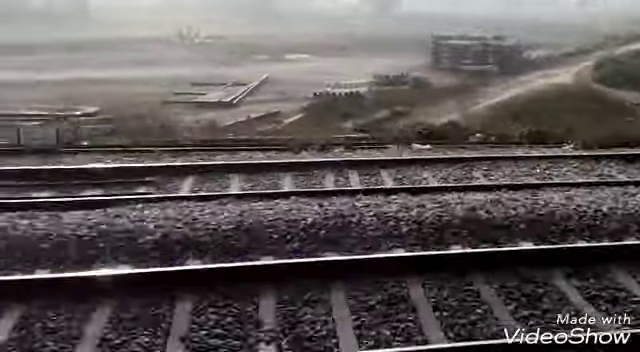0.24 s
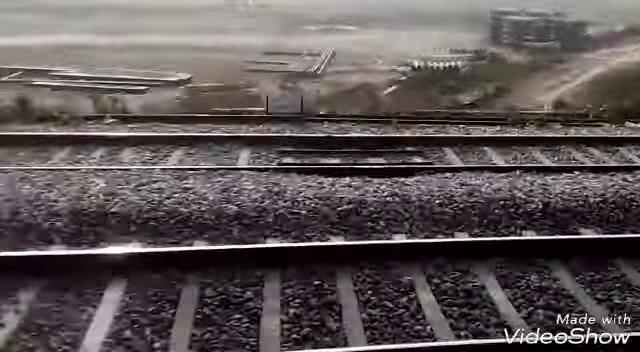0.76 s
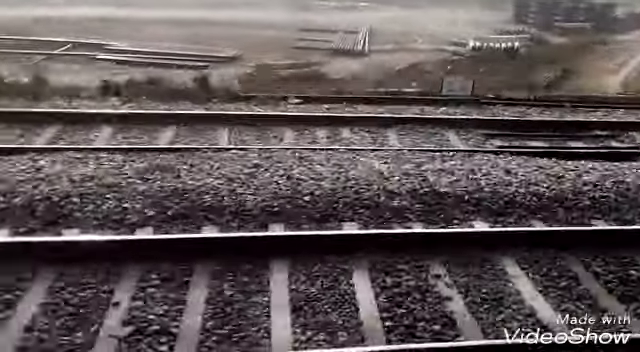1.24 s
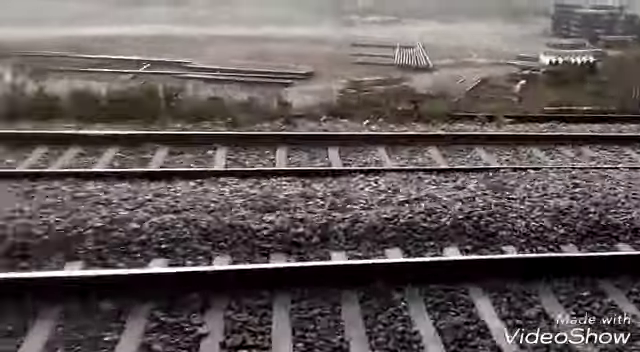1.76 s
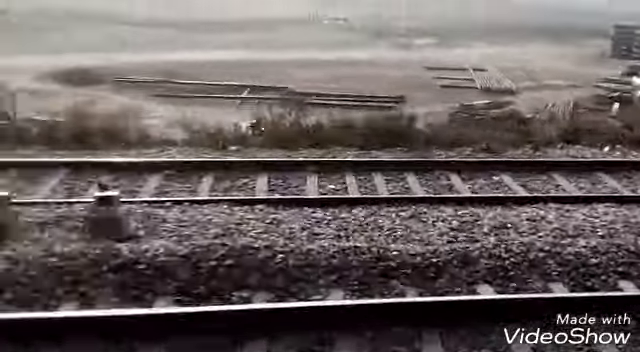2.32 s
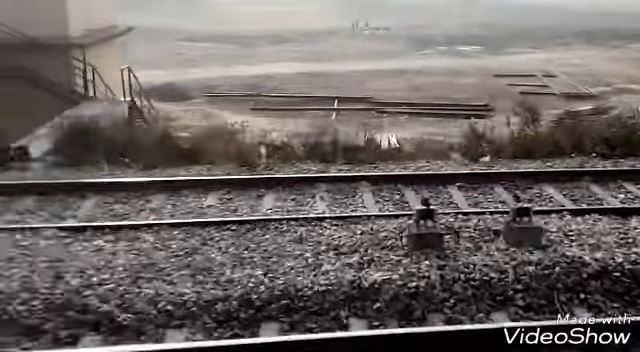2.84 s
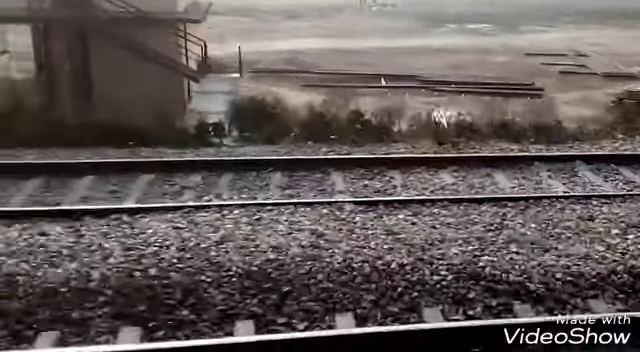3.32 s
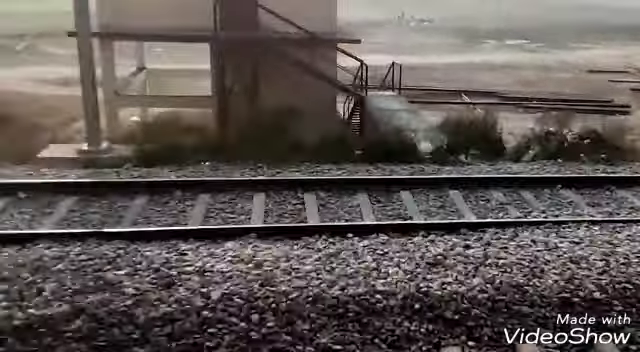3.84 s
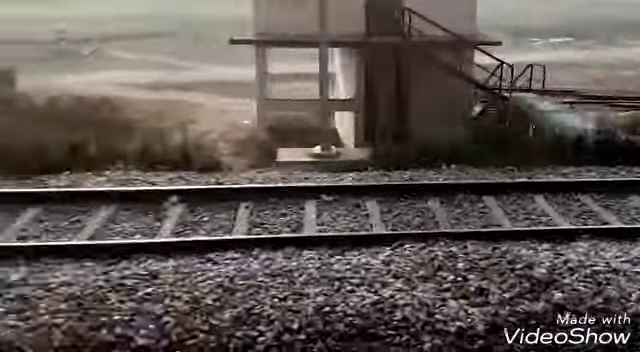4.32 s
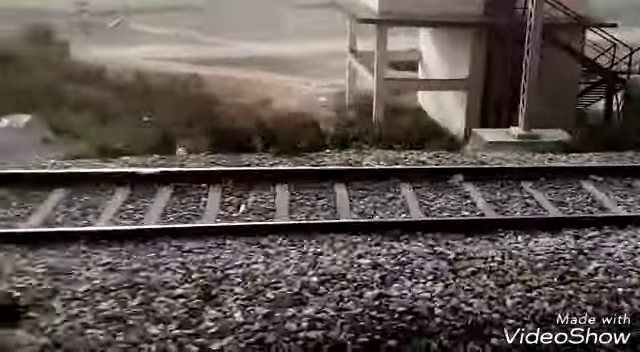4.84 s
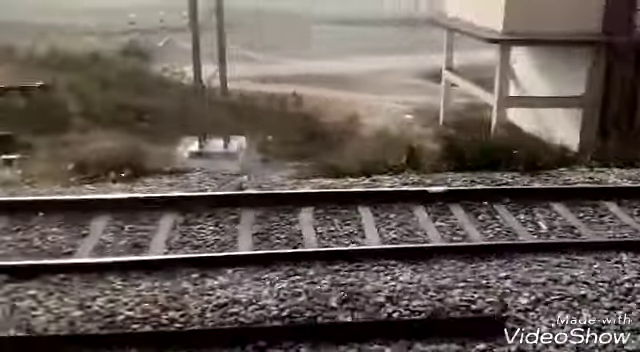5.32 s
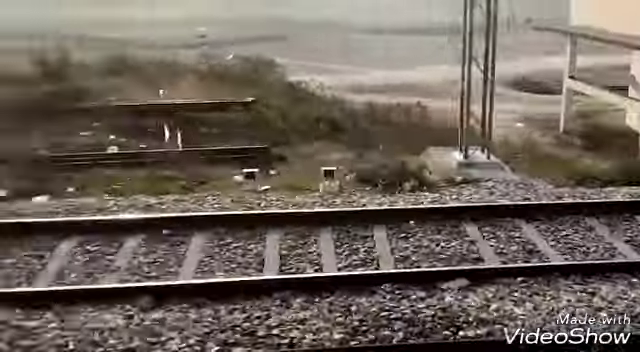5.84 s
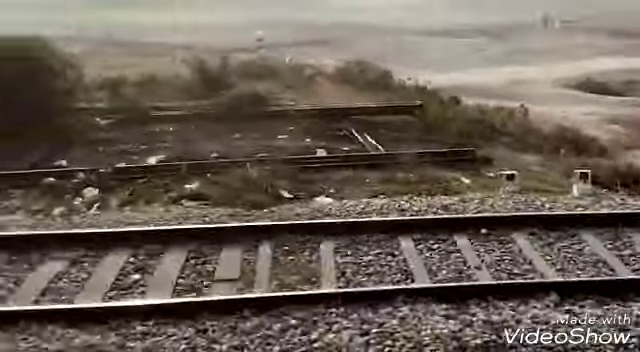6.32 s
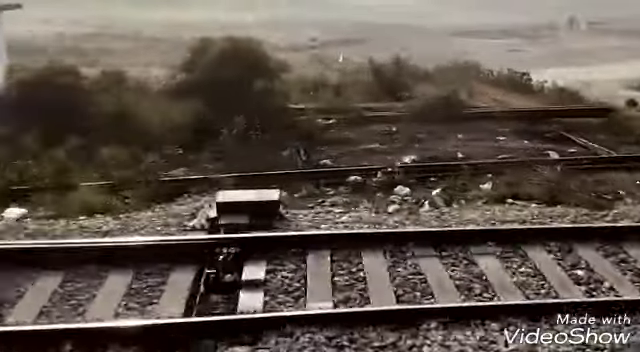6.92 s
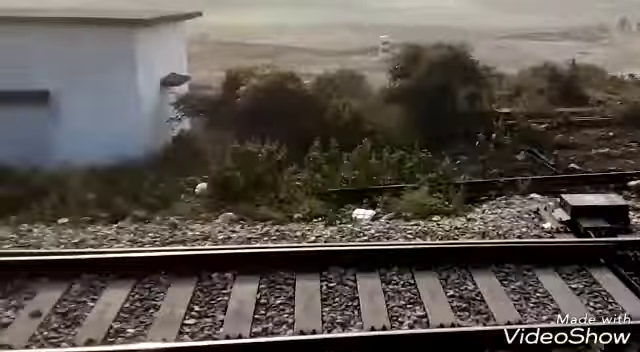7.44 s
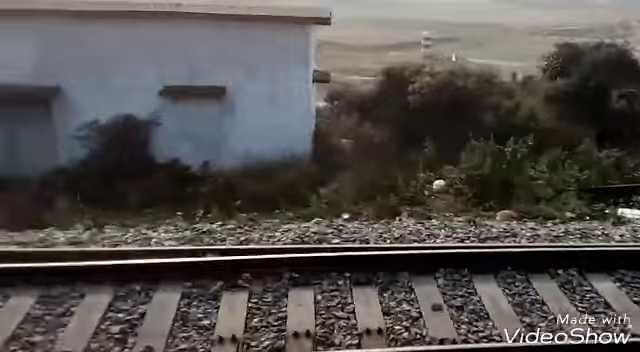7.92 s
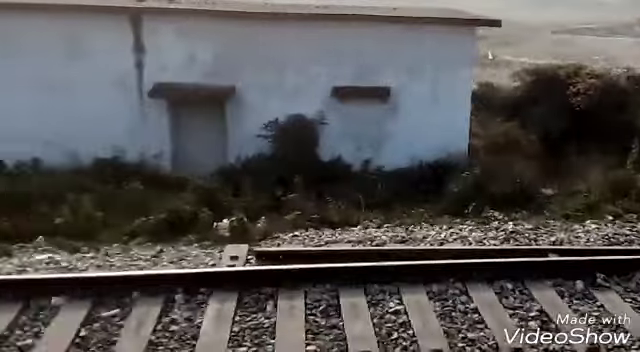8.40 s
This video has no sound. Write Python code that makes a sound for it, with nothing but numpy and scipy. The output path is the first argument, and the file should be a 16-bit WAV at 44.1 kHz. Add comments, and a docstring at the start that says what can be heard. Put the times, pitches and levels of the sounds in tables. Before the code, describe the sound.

A close, boxy coach interior with low, bass-heavy train rumble and irregular wheel knocks. It begins rough, with rapid overlapping thumps and muffled steel rattle, then thins to separate double thuds with hollow panel knocks and a humming body. Weak, broken squeals and scraping pass midway. From about 7.3 seconds the knocks bunch up again, heavy and clanking. The microphone is inside, so high frequencies stay faint.

```python
"""Railway coach on uneven track.

Heard inside a coach rolling slowly through a yard: wheels rumble (shaped noise) and knock over joints.
Each knock is a floor heave with ringing body modes; steel clatters in bursts of taps, clacks and clanks.
The body booms and sways after jolts, wall panels hum (resonated noise), a loose panel knocks.
The flange rubs (many tiny squeaks) and squeals faintly (gliding tones); the microphone adds a trace of hiss."""
import sys
import numpy as np
from scipy import signal
from scipy.fft import rfft, irfft, next_fast_len
from scipy.io import wavfile
from scipy.ndimage import uniform_filter1d

SR = 44100
rng = np.random.default_rng(int(sys.argv[2]) if len(sys.argv) > 2 else 0)


def pcm_store(signal):
    """Save signal as 16-bit PCM."""
    levels = np.round(np.clip(np.atleast_2d(signal), -1, 1) * 32767)
    wavfile.write(sys.argv[1], SR, levels.astype(np.int16).T)


N = 382347
TIME = np.arange(N) / SR

# ride roughness: [t/s, rumble level/dB, rail roar level/dB]
RIDE = [(0.0, -38, -61), (0.289, -43.5, -68.5), (0.62, -39, -65), (1.03, -42.5, -66), (2.25, -45, -67.5),
        (2.8, -44.5, -65.5), (3.16, -47.5, -66.5), (3.54, -43.5, -69), (5.84, -47.5, -65),
        (6.35, -45.5, -64), (7.159, -46.5, -64.5), (7.45, -42, -64), (7.91, -39, -63), (8.6, -48, -65.5)]
# wheel modes: [f/Hz, level/dB]
WHEEL_MODES = [(1264, 5.5), (1333, 0), (1435, -1.5), (1520, -2), (1600, -2.5), (1703, -1.5), (1790, -8.5),
               (1910, -5.5), (2020, -7.5), (2126, -8), (2580, -9), (2780, -17.5), (3080, -7)]
# wheels striking joints and crossings: [crest t/s, thud level/dB, f/Hz, coach ring/dB re thud,
# rebound/dB re thud, clatter level/dB, clatter brightness/dB, boom level/dB]
WHEEL_JOLTS = [(.067, -22, 149, -4.5, -8, -43, -11, -39), (0.214, -28, 138, -2.5, -18, -62.5, 1.5, -44.5),
               (0.319, -25.5, 180, -5.5, -16, -64.5, -10, -45),
               (.343, -27.5, 122, -9.5, -16, -67.5, -7, -52),
               (.413, -21.5, 120, -3, -11.5, -61.5, 1.5, -58.5), (.443, -21, 194, -5, 0.5, -51, 2.5, -46.5),
               (0.516, -26, 127, -4, -6, -64, 8, -54.5), (.593, -30, 130, -6.5, -15, -65.5, -2, -55.5),
               (.642, -21.5, 157, -5.5, 4, -59, 7.5, -58.5), (0.705, -23, 147.5, -3, -18, -56, 3.5, -63),
               (0.746, -24.5, 125, -12, -13.5, -70, 0.5, -60.5),
               (.793, -18.5, 107, -8, -1.5, -60, -3.5, -55.5),
               (.87, -25.5, 131, -6.5, -18.5, -67.5, 0, -59.5),
               (.959, -30, 117.5, -9, -15, -63.5, -5.5, -57), (1.024, -20.5, 189, -4.5, 2, -55, 3, -55),
               (1.068, -19.5, 150, -9, -10.5, -46.5, 0, -61.5),
               (1.144, -27.5, 153, -8, -6, -46.5, -8.5, -53), (1.314, -29, 149, -4.5, -7, -49, -3.5, -50),
               (1.413, -21, 134, -27, -7, -62, 5, -60), (1.452, -28, 123, -21, -4, -61.5, 10, -46),
               (1.656, -20, 97, -11, -24, -58, 10, -52), (2.052, -29, 84, -14, -19, -69, 1, -57),
               (2.39, -24.5, 221, -7.5, -3.5, -59.5, 7, -44),
               (2.765, -11.5, 214, -11.5, -15, -62.5, 0.5, -43), (2.783, -20, 130, -2, -12, -58, 9.5, -63),
               (3.383, -26, 173, -2.5, -20, -63.5, 7, -63), (3.464, -26, 172, -23, -14, -57, -9, -46),
               (3.833, -24.5, 204, 0, -10, -56, -14, -44.5), (3.893, -22, 183, -8, -21, -49, -0.5, -43.5),
               (4.269, -20.5, 196, 0.5, -17.5, -44.5, -1.5, -35.5),
               (4.3, -22.5, 178, -10.5, -11, -53, 5, -56), (4.64, -26.5, 147, -1, -3.5, -56, 2, -48.5),
               (4.654, -31, 279, -1, -19.5, -68, -3, -59.5),
               (4.672, -22.5, 160, -0.5, -16, -48.5, -6, -44.5),
               (4.89, -27, 188, -8.5, -17, -45.5, -6, -47.5), (5.28, -32, 188, -8, -4.5, -55, 2, -59.5),
               (5.383, -54.5, 187, 4, -4, -51, -6, -70), (5.587, -30, 150, -11.5, -8, -50, -4.5, -48),
               (5.776, -20, 140, -17, -11, -62, 0, -34), (5.965, -26, 154, -4, -11, -68, -6, -47),
               (6.152, -18.5, 160, -3.5, -26, -50, 3, -42.5), (6.213, -27.5, 153, -14, -16, -61, 5, -53),
               (6.535, -29, 140, -3, -6.5, -67, -1, -51), (6.571, -20, 233, -9.5, -18.5, -60, 5.5, -35.5),
               (6.911, -27.5, 145, -19, -7, -64.5, -2, -44.5), (7.187, -35, 126, 5, -8, -52, -11, -54.5),
               (7.3, -20.5, 155.6, -3.5, -11, -41.5, -7, -62),
               (7.616, -20, 220, -8.5, -14.5, -60, -6, -56.5),
               (7.632, -19, 191, -2.5, -12, -62.5, 0.5, -58),
               (7.676, -19.5, 154, -20.5, -12.5, -40, -12.5, -51.5),
               (7.849, -28, 193, -12, -10.5, -65, -3.5, -43), (7.878, -14, 123, -6.5, -6, -48, 3.5, -51),
               (8.01, -21.5, 174, 0.5, -8.5, -36.5, -14, -56.5), (8.158, -26.5, 106, -11, -15, -67, 2, -59),
               (8.254, -19.5, 100, -2, -7, -50, 10, -60.5), (8.6, -30, 225, 4.5, -3.5, -41, -7, -69)]
REBOUND_DELAY_S = 0.01888


def amp(db):
    """Decibels to gain."""
    return 10 ** (np.asarray(db) / 20)


def evened(x):
    """Scales to an rms of one."""
    return x / np.sqrt(np.mean(x ** 2) + 1e-20)


def coloured(x, points):
    """Imposes a spectrum drawn through [f/Hz, level/dB] points, at an rms of one."""
    hz, db = np.transpose(points)
    bins_hz = np.fft.rfftfreq(len(x), 1 / SR)
    gain = amp(np.interp(np.log(bins_hz + 1), np.log(hz), db))
    return evened(irfft(rfft(x) * gain, len(x)))


def noise(points):
    """Steady noise of the given spectrum."""
    return coloured(rng.standard_normal(next_fast_len(N, True)), points)[:N]


def wander(max_hz):
    """Random slow curve of unit rms: a sum of sines up to max_hz."""
    t = np.linspace(0, N / SR, 4000)
    rates_hz = max_hz * np.geomspace(1 / 16, 1, 32)
    waves = np.sin(2 * np.pi * (rates_hz[:, None] * t + rng.random((len(rates_hz), 1))))
    return np.interp(TIME, t, evened(waves.sum(0)))


def add(mix, s, sound):
    """Lays a sound into the mix at time s, cropped to the mix."""
    start = round(s * SR)
    part = mix[max(start, 0):][:max(len(sound) + min(start, 0), 0)]
    part += sound[max(-start, 0):][:len(part)]


def resonate(x, hz, width_hz):
    """One resonance, of gain one at its centre."""
    return signal.lfilter(*signal.iirpeak(hz, hz / width_hz, SR), x)


def bursts(rows, rise_s):
    """Envelope of [t/s, level/dB, fade/s] blows that build up quickly and die away exponentially."""
    envelope, t = np.zeros(N), np.arange(-SR // 16, SR // 2) / SR
    for s, db, fade_s in rows:
        add(envelope, s + t[0], amp(db) * np.exp(-np.where(t < 0, (t / rise_s) ** 2, t / abs(fade_s))))
    return envelope


def struck(hits, modes, rise_s, reach_hz, scatter, tail_db, tail_s):
    """Steel rings hard for an instant, then faintly on; modes near the struck pitch speak most."""
    out, t = np.zeros(N), np.arange(-SR // 32, SR // 4) / SR
    hz, mode_db = np.transpose(modes)[:, :, None]
    for s, db, fade_s, struck_hz in hits:
        detune, phase = rng.random((2, len(modes), 1))
        dying = np.maximum(np.exp(-abs(t / fade_s)), amp(tail_db) * np.exp(-abs(t / tail_s)))
        shape = np.where(t < 0, np.exp(-(t / rise_s) ** 2), dying)
        share = amp(mode_db) * np.exp(-((hz - struck_hz) / reach_hz) ** 2)
        detuned_hz = hz * (1 + scatter * (2 * detune - 1))
        ring = shape * (share * np.sin(2 * np.pi * (detuned_hz * t + phase))).sum(0)
        add(out, s + t[0], amp(db) * ring * np.linalg.norm(shape) / np.linalg.norm(ring))
    return out


def ride(t):
    """Rumble level at the times t, in dB re the mean of its table."""
    s, db, _ = np.transpose(RIDE)
    return np.interp(t, s, db) - np.mean(db)


def lumpy(x, size_db, lump_hz, lump_s):
    """Rough rail makes neighbouring pitches flare up and sink independently."""
    hz, t, z = signal.stft(x, SR, nperseg=1024, noverlap=768)
    field = rng.standard_normal(z.shape)
    for axis, span in enumerate([lump_hz / hz[1], lump_s / t[1]]):
        field = uniform_filter1d(field, max(round(span), 1), axis)
    lumped = signal.istft(z * amp(size_db * evened(field)), SR, nperseg=1024, noverlap=768)[1]
    return evened(lumped[:N])


def jingle(pings_per_s=350, ring_s=0.015, low_hz=480, high_hz=3000, size_db=4):
    """Countless small loose parts each ping briefly at a pitch of their own."""
    out, t = np.zeros(N), np.arange(SR // 14) / SR
    for when, pitch, length, size in rng.random((int(pings_per_s * N / SR), 4)):
        envelope = (1 - np.exp(-t / 0.0011)) * np.exp(-t / (ring_s * (.5 + length)))
        hz = low_hz * (high_hz / low_hz) ** pitch
        db = size_db * min(-np.log(1 - size), 2)
        add(out, when * N / SR, amp(db) * envelope * np.sin(2 * np.pi * hz * t))
    return evened(out)


def rolling(rumble_db=2, roar_db=-1.5, jingle_db=-3, lumps_db=1.03, grit_db=1.0,
            panel_hz=330, panel_share=0.065):
    """Rough wheels on rough rail: lumpy rumble in the body, fainter roar from outside, grainy steel jingle."""
    # spectra: [f/Hz, level/dB]
    rumble_colour = [(15, -8.5), (28, -9), (40, -17), (56, 3), (76, 6), (110, 1.5), (135, 3), (168, 0.5),
                     (205, -3), (275, -3), (320, -9.5), (390, -10.5), (440, -13.5), (550, -36), (800, -40),
                     (2000, -78.5)]
    roar_colour = [(200, -25.5), (450, 11.5), (600, 1.5), (850, 1), (1000, -4), (1130, -1.5), (1400, -22),
                   (1900, -22.5), (2300, -27.5), (2620, -20.5), (2850, -30.5), (3300, -22), (6000, -52)]
    jingle_colour = [(250, -13.5), (500, 3), (800, -2.5), (1130, -9), (1400, -17), (1900, -16), (2300, -20),
                     (2700, -17.5), (3300, -22), (6000, -44)]
    s, body_db, rail_db = np.transpose(RIDE)
    bumps = wander(25)
    ride_db = np.interp(TIME, s, body_db)
    body = lumpy(noise(rumble_colour), size_db=3.0, lump_hz=170, lump_s=.06)
    deep = signal.sosfiltfilt(signal.butter(4, panel_hz, fs=SR, output="sos"), body)
    # uneven track mostly shakes the deep end; small panels follow only in part
    panel_db = panel_share * ride_db + (1 - panel_share) * np.median(ride_db)
    rumble = deep * amp(ride_db) + (body - deep) * amp(panel_db)
    rumble = rumble * amp(rumble_db + lumps_db * bumps)
    roar = amp(roar_db) * lumpy(noise(roar_colour), size_db=5.0, lump_hz=190, lump_s=.035)
    steel = roar + amp(jingle_db) * coloured(jingle(), jingle_colour)
    return rumble + steel * amp(np.interp(TIME, s, rail_db) + 0.5 * bumps + grit_db * wander(40))


def hums(swell_db=4.5, follow=0.39):
    """Wall panels resonate to noise, swell separately as the coach flexes, hum louder on rough track."""
    # panels: [f/Hz, width/Hz (half that of each filter), level/dB]
    panels = [(273, 12, -55.5), (427.2, 20, -60), (510, 60, -67.5)]
    humming = np.zeros(N)
    for hz, width_hz, db in panels:
        tone = resonate(rng.standard_normal(N), hz, 2 * width_hz)
        tone = resonate(tone, hz, 2 * width_hz)
        humming += amp(db) * evened(tone * amp(swell_db * wander(7)))
    return humming * amp(follow * ride(TIME))


def flange(slips_per_s=240, slip_s=0.028, spread=.09, size_db=4.5):
    """The flange catches and slips on the rail; tiny squeaks near the wheel's modes merge into a scrape."""
    # rubbing: [t/s, level/dB]
    rubbing = [(0, -83.5), (1.9, -84.5), (2.6, -83.5), (4.4, -83), (4.85, -79.5), (5.2, -77), (5.7, -82),
               (6.3, -82.5), (8.67, -79.5)]
    out, t = np.zeros(N), np.arange(SR // 10) / SR
    for when, which, length, size, detune in rng.random((int(slips_per_s * N / SR), 5)):
        mode_hz, db = WHEEL_MODES[int(which * len(WHEEL_MODES))]
        age = t / (slip_s * (.5 + length))
        hz = mode_hz * (1 + spread * (2 * detune - 1))
        squeak = age * np.exp(-age ** 2) * np.sin(2 * np.pi * hz * t)
        add(out, when * N / SR, amp(db + size_db * min(-np.log(1 - size), 2)) * squeak)
    return evened(out) * amp(np.interp(TIME, *np.transpose(rubbing)))


def squeals(waver=.005, flutter_db=5, level_db=-1):
    """Thin, broken tones that catch, slide and let go as the flange leans on the rail."""
    # tones: [t/s, length/s, level/dB, first f/Hz, last f/Hz]
    tones = [(0.677, 0.064, -70, 1980, 2020), (4.283, 0.12, -79.5, 2500, 2630),
             (4.75, .11, -76, 1644, 1610), (4.832, .07, -74, 1650, 1690), (4.833, 0.13, -76, 1940, 1935),
             (4.9, 0.16, -78, 1600, 1470), (4.95, .07, -74, 1660, 1600), (5.007, 0.083, -82, 2090, 2130),
             (5.053, 0.093, -73, 1340, 1350), (5.068, .07, -72, 1415, 1440), (5.133, 0.11, -78, 2130, 2080),
             (5.15, 0.076, -83, 1960, 2010), (5.202, .12, -82, 1460, 1400), (5.4, 0.091, -83, 1730, 1760),
             (5.43, 0.33, -85, 2670, 2580), (6.241, 0.42, -79.5, 1510, 1584),
             (6.866, 0.48, -84, 1940, 1860), (7.708, .05, -74.5, 2060, 2020)]
    out, drift, grip = np.zeros(N), wander(130), np.tanh(wander(50))
    for s, length_s, db, first_hz, last_hz in tones:
        span = (TIME >= s) & (TIME < s + length_s)
        along = (TIME[span] - s) / length_s
        hz = (first_hz + (last_hz - first_hz) * along) * (1 + waver * drift[span])
        tone = np.sin(np.pi * along) * np.sin(2 * np.pi * np.cumsum(hz) / SR)
        add(out, s, amp(db + level_db + flutter_db * grip[span]) * tone)
    return out


def heaves(spring_hz=28, length_s=0.044):
    """The coach heaves on its springs at the deepest dips: a low sway of a few cycles."""
    # sways: [t/s, peak level/dB]
    sways = [(.46, -46.5), (.67, -45), (1.05, -46), (1.42, -45), (2.05, -47), (5.77, -49), (5.97, -50),
             (6.15, -45), (7.67, -48), (8.27, -40)]
    out, t = np.zeros(N), np.arange(-SR // 4, SR // 4) / SR
    for s, db in sways:
        add(out, s + t[0], amp(db) * np.exp(-(t / length_s) ** 2) * np.cos(2 * np.pi * spring_hz * t))
    return out


def drone(hz=57.1, waver=0.015, delay_s=0.14, rise_s=0.058, fade_s=0.13):
    """A low resonance of the coach swells shortly after each jolt and fades."""
    power, t = np.zeros(N), np.arange(-SR // 4, SR // 2) / SR
    swell = np.exp(-(t / np.where(t < 0, rise_s, fade_s)) ** 2)
    for s, *_, boom_db in WHEEL_JOLTS:
        add(power, s + delay_s + t[0], amp(boom_db) ** 2 * swell)
    turns = np.cumsum(hz * (1 + waver * wander(22))) / SR
    return np.sqrt(2 * power) * np.sin(2 * np.pi * turns)


def clanks():
    """Hard blows ring the wheel itself."""
    # blows to a wheel: [t/s, level/dB, fade/s, most strongly struck f/Hz]
    wheel_hits = [(.074, -64.5, 0.017, 1340), (.45, -74, 0.045, 1990), (.503, -69.5, 0.023, 1395),
                  (.508, -75, 0.022, 1980), (.646, -66.5, 0.016, 1530), (.664, -62.5, 0.014, 1614),
                  (1.018, -61.5, 0.014, 1310), (1.031, -59, 0.013, 1720), (1.034, -57, .011, 1340),
                  (1.066, -70, 0.011, 1710), (1.654, -65.5, 0.016, 1520), (2.04, -74, 0.011, 1700),
                  (2.405, -69.5, .012, 1560), (2.763, -67.5, 0.014, 1390), (2.768, -78, 0.019, 2970),
                  (3.89, -74, 0.037, 1700), (4.263, -69, 0.025, 1870), (4.282, -77, 0.019, 2900),
                  (5.184, -68, .018, 1430), (5.372, -68, 0.024, 1470), (5.772, -67, 0.017, 1550),
                  (6.15, -76, 0.016, 1400), (7.298, -67, .02, 1350), (7.872, -57, .008, 1540),
                  (7.874, -64, 0.0075, 2000), (7.884, -61.5, 0.01, 1560), (8.005, -66, 0.011, 1260),
                  (8.243, -64, .014, 1350), (8.258, -64.5, 0.022, 1790), (8.29, -63, .01, 1450)]
    return struck(wheel_hits, WHEEL_MODES, rise_s=0.0019, reach_hz=220, scatter=0.018,
                  tail_db=-15, tail_s=0.038)


def clacks():
    """The bogie's heavy steel fittings clack against their stops, short and dull."""
    # blows to the stops: [t/s, level/dB, fade/s, most strongly struck f/Hz]
    stop_hits = [(.073, -48.5, 0.019, 610), (.435, -51, 0.013, 685), (.455, -48.5, 0.023, 714),
                 (.695, -56.5, .018, 666), (1.069, -47.5, 0.034, 740), (1.148, -53, .02, 520),
                 (1.297, -51, 0.014, 670), (2.763, -59.5, .022, 754), (3.888, -53.5, 0.035, 720),
                 (4.263, -54, 0.028, 676), (4.661, -51.5, 0.024, 640), (5.1, -59, .02, 800),
                 (5.274, -64, 0.018, 940), (5.381, -53, .014, 712), (5.759, -54, 0.025, 796),
                 (6.208, -55.5, 0.019, 760), (6.582, -52.5, 0.03, 795), (7.293, -55, 0.019, 800),
                 (7.318, -55, 0.012, 630), (7.622, -51.5, .016, 780), (7.674, -49, .02, 660),
                 (7.872, -52, 0.015, 884), (8.0, -48, 0.022, 790), (8.05, -52.5, 0.012, 600),
                 (8.241, -49.5, 0.018, 790), (8.262, -60, .012, 800), (8.285, -51, .014, 720)]
    # fitting modes: [f/Hz, level/dB]
    fitting_modes = [(545, 7.5), (612, -1.5), (668, -5), (735, -0.5), (815, -8.5), (885, -3), (970, -7.5),
                     (1060, -4.5), (1150, 0.5)]
    return struck(stop_hits, fitting_modes, rise_s=0.0012, reach_hz=330, scatter=0.049,
                  tail_db=-9.5, tail_s=0.031)


def knocks(crest_s=0.0062, overtone=1.13, overtone_db=-7):
    """A loose panel answers hollowly with a short pair of close modes."""
    # panel knocks: [t/s, level/dB, f/Hz]
    panel_hits = [(0.011, -37.5, 415), (.439, -40.5, 350), (1.17, -41.5, 487), (1.199, -55, 463),
                  (1.312, -38.5, 486), (2.151, -50, 450), (2.391, -41.5, 381), (2.801, -41.5, 269),
                  (3.699, -51, 390), (3.893, -44, 380), (3.93, -48, 394), (4.264, -32, 380),
                  (4.402, -47.5, 431), (4.54, -52, 510), (4.669, -41.5, 367), (5.329, -43.5, 360),
                  (5.767, -44.5, 351), (6.152, -39.5, 374), (6.573, -40, 375), (7.299, -43, 398),
                  (7.548, -45.5, 397), (7.671, -37.5, 373), (8.014, -35, 313), (8.03, -41, 336),
                  (8.254, -47, 354), (8.293, -43.5, 429), (8.599, -54, 394)]
    out, t = np.zeros(N), np.arange(SR // 6) / SR
    swell = t / crest_s * np.exp(1 - t / crest_s)
    for s, db, hz in panel_hits:
        upper = np.sin(2 * np.pi * (overtone * hz * t + rng.random()))
        pair = np.sin(2 * np.pi * hz * t) + amp(overtone_db) * upper
        add(out, s - crest_s / 2, amp(db) * swell * pair)
    return out


def clatter(rise_s=0.0096, lead_s=0.0087, fade_s=0.036, taps_per_s=800, blur=0.79, bright_hz=560,
            again_db=-5, level_db=-3.0, rattles_per_s=5, rattle_max_db=-66.5, rattle_fade_s=0.0073):
    """Jolts and rebounds shake loose bursts of tiny steel taps, muffled by the floor; stray rattles too."""
    # spectrum: [f/Hz, level/dB]
    steel_colour = [(150, -37.5), (250, 2), (320, -2), (430, 9), (540, -3), (680, -5.5), (850, -8),
                    (1100, -15), (1400, -23), (2050, -29), (2250, -41.5), (3100, -43), (6000, -65),
                    (16000, -70.5)]
    size = next_fast_len(N, True)
    taps = evened(rng.standard_normal(size) * (rng.random(size) < taps_per_s / SR))
    steel = coloured(taps + blur * rng.standard_normal(size), steel_colour)[:N]
    dull = signal.sosfiltfilt(signal.butter(3, bright_hz, fs=SR, output="sos"), steel)
    shakes = []
    for s, *_, rebound_db, db, bright_db, _boom_db in WHEEL_JOLTS:
        shakes.append((s - lead_s, db, bright_db))  # just before the floor crests
        shakes.append((s + REBOUND_DELAY_S, db + rebound_db + again_db, bright_db))
    lower = bursts([(s, db, fade_s) for s, db, _ in shakes], rise_s)
    upper = bursts([(s, db + bright_db, fade_s) for s, db, bright_db in shakes], rise_s)
    chances = rng.random((int(rattles_per_s * N / SR), 2))
    rattles = [(when * N / SR, rattle_max_db - 10 * soft, rattle_fade_s) for when, soft in chances]
    stray = bursts(rattles, rise_s)
    return amp(level_db) * (lower * dull + upper * (steel - dull)) + stray * steel


def blows(rebound_hz=140, rebound_follow=0.11, rebound_ring_db=2,
          bumps_per_s=4.1, bump_db=-36, bump_spread_db=6, rough_db_per_doubling=4,
          bump_hz=136, bump_pitch_spread=0.23, bump_ring_db=-4):
    """Floor blows as [t/s, level/dB, f/Hz, ring/dB]: jolts, rebounds, chance bumps (more on rough track)."""
    rows = []
    for s, db, hz, ring_db, rebound_db, *_ in WHEEL_JOLTS:
        rows.append((s, db, hz, ring_db))
        # the rebound's pitch follows the jolt's only slightly
        back_hz = rebound_hz * (hz / rebound_hz) ** rebound_follow
        rows.append((s + REBOUND_DELAY_S, db + rebound_db, back_hz, ring_db + rebound_ring_db))
    slot_s = 1 / 16
    slots = np.arange(0, N / SR, slot_s)
    for s, (chance, late, size, pitch) in zip(slots, rng.random((len(slots), 4))):
        if chance < bumps_per_s * slot_s * 2 ** (ride(s) / rough_db_per_doubling):
            db = bump_db + ride(s) + bump_spread_db * (2 * size - 1)
            hz = bump_hz * (1 + bump_pitch_spread * (2 * pitch - 1))
            rows.append((s + late * slot_s, db, hz, bump_ring_db))
    return rows


def thuds(rise_cycles=0.76, fall_cycles=0.85, ring_gain_db=0.5, scatter=0.027, share_spread_db=3.0):
    """Each blow heaves the sprung floor for a cycle or two; the coach panels ring on after it."""
    # coach body modes: [f/Hz, level/dB, t60/s]
    body_modes = [(77.5, -6.5, 0.43), (102.7, 5, 0.2), (117.2, -13, 1), (149.7, -3, 0.2), (169, -6.5, 0.14),
                  (194, -10, 0.39), (229.7, 7.5, 0.24), (271.1, 3, 0.22), (305, -4, 0.02),
                  (344.6, -6.5, 0.21), (371.4, -9.5, 0.26), (448.2, -2.5, 0.09), (530, -16.5, 0.062)]
    out, t = np.zeros(N), np.arange(SR // 5) / SR
    lead_s = 1 / 32
    mode_hz, mode_db, t60_s = np.transpose(body_modes)[:, :, None]
    for s, db, hz, wet_db in blows():
        turns = (t - lead_s) * hz
        bell = np.exp(-(turns / np.where(turns < 0, rise_cycles, fall_cycles)) ** 2)
        heave = bell * np.cos(2 * np.pi * turns)
        # every blow lands elsewhere, so the panels share it differently
        detune, share, phase = rng.standard_normal((3, len(body_modes), 1))
        reach = 1 / np.sqrt(1 + (mode_hz / (1.37 * hz)) ** 4)  # a low blow leaves the high modes alone
        gains = reach * amp(mode_db + share_spread_db * share - 60 * t / t60_s)
        modes = gains * np.sin(2 * np.pi * (mode_hz * (1 + scatter * detune) * t + phase))
        ring = modes.sum(0) * (1 - np.exp(-t / 0.0016))
        ring *= np.linalg.norm(heave) / np.linalg.norm(ring)
        add(out, s - lead_s, amp(db) * heave)
        add(out, s, amp(db + wet_db + ring_gain_db) * ring)
    return out


def through_floor(x):
    """The floor favours some pitches and swallows others: peaks and dips in series."""
    # floor response: [f/Hz, width/Hz, level/dB]
    floor_bands = [(77.4, 8.5, 2.5), (220.5, 68, -6.5), (258.2, 42, 4)]
    for hz, width_hz, db in floor_bands:
        x = x + (amp(db) - 1) * resonate(x, hz, width_hz)
    return x


def scene():
    """Everything that reaches the seat."""
    track = rolling() + hums() + flange() + squeals()
    body = heaves() + drone() + knocks()
    steel = clanks() + clacks() + clatter()
    return (track + body + steel + through_floor(thuds()))[None]


def record(dry, hiss_db=-79, edge_hz=15750):
    """A soft start, microphone hiss, then the band limit."""
    # spectrum: [f/Hz, level/dB]
    hiss_colour = [(100, -6.5), (2500, -2), (4000, -0.5), (6000, -2), (7000, -5), (7900, -12), (13600, -13),
                   (14900, -5), (15700, -4)]
    fade_in = np.minimum(TIME / .003, 1)
    heard = fade_in * dry + amp(hiss_db) * noise(hiss_colour)
    lowpass = signal.firwin(511, edge_hz, window=("kaiser", 9), fs=SR)
    return signal.oaconvolve(heard, lowpass[None], "same")


dry = scene()
out = record(dry)
pcm_store(out)
```